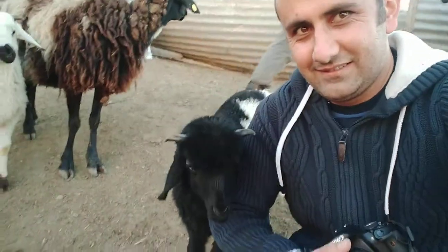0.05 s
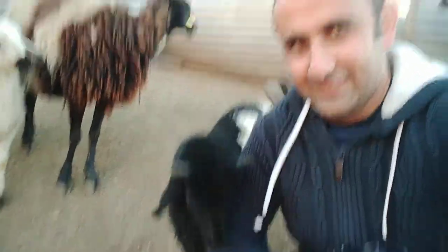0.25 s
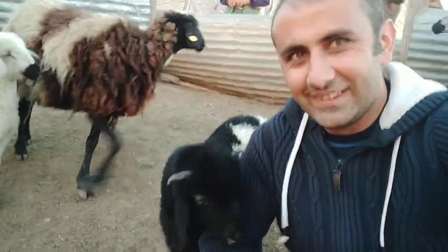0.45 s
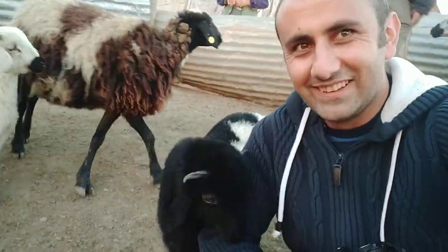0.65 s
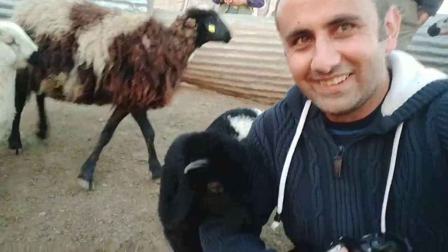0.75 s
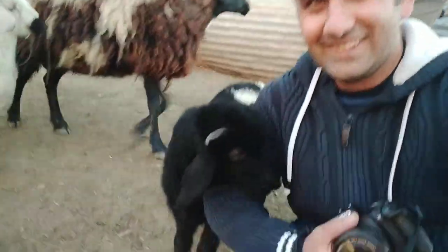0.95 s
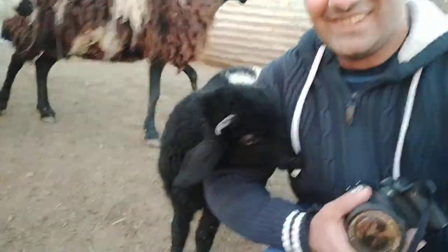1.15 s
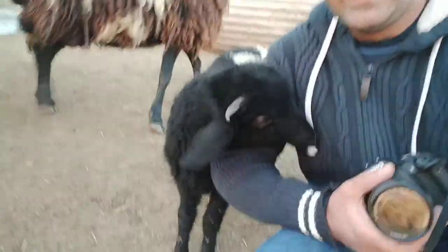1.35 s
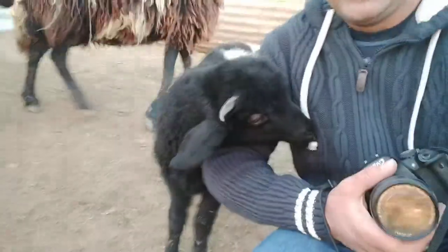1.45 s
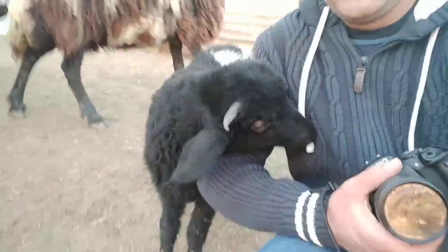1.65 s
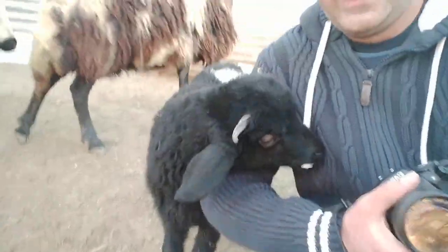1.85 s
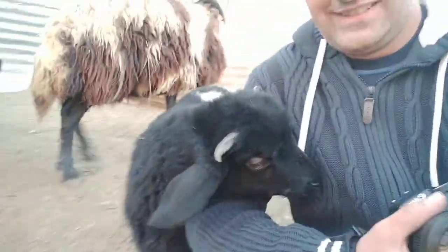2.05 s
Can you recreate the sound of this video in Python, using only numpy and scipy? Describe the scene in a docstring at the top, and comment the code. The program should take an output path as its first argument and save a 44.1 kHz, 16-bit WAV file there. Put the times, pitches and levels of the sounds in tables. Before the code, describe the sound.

A sheep a few steps away grunts through its nose, then gives one long, low bleat in an outdoor pen. Small ticks and a faint distant bleat follow, and a lamb quietly starts a higher, nasal call.

```python
"""A sheep a few steps away in an outdoor pen grunts through its nose, then opens into one long, low bleat:
vocal-fold pulses ring its throat, rough at first, clear on the held note, creaky at the end, coloured by
echoes off the hard ground and fences. Small ticks and thuds of grit and handling follow, with a thin far
whistle and a faint far bleat. Last, a lamb starts a high, nasal call. Soft outdoor air runs underneath."""
import sys
import numpy as np
from scipy import signal
from scipy.fft import rfft, irfft
from scipy.io import wavfile
from scipy.ndimage import uniform_filter1d, map_coordinates

SR = 44100
rng = np.random.default_rng(int(sys.argv[2]) if len(sys.argv) > 2 else 0)


def digitize_waveform(pressure):
    """Quantize a signal to 16-bit integers and store it at the path in sys.argv[1].

    Rows of a 2-D input are taken as channels; values are limited to [-1, 1].
    """
    field = np.atleast_2d(pressure).T
    bounded = np.clip(field, -1, 1)
    quanta = np.round(bounded * 32767).astype(np.int16)
    wavfile.write(sys.argv[1], SR, quanta)


N = 92610
TIME = np.arange(N) / SR

# The bleat's melody: lead-in, held note, falling tail (time [s], pitch [Hz])
PITCH_ONSET = [(0.12, 116.2), (0.19, 119.6)]
PITCH_HELD = [(0.22, 118.5), (0.248, 126.1), (0.28, 129.8), (0.296, 128.9), (0.318, 119), (0.328, 121.9),
              (0.38, 136), (0.426, 127.5), (0.484, 135.8), (0.518, 134.7), (0.634, 134.1), (0.704, 130.6),
              (0.748, 129.3), (0.85, 125.1)]
PITCH_FALL = [(0.871, 111), (0.898, 93.93), (0.938, 73.8)]
# Gravel in the vocal folds (time [s], roughness [0-1])
ROUGHNESS = [(0.2, 0.59), (0.32, 0.76), (0.42, 0.31), (0.5, 0.23), (0.68, 0.22), (0.82, 0.44), (0.88, 0.93)]
# First resonance, rising as the mouth opens (time [s], centre [Hz])
JAW = [(0.22, 518), (0.29, 509), (0.37, 585), (0.55, 590), (0.8, 589.5), (0.89, 547.6)]
# Second resonance, lifted by the tongue (time [s], centre [Hz])
TONGUE = [(0.13, 1170), (0.155, 1300), (0.175, 1790), (0.2, 1900), (0.24, 1717), (0.42, 1712), (0.55, 1768),
          (0.7, 1700), (0.82, 1545), (0.91, 1754)]
# Steady throat resonances in three registers (centre [Hz], width [Hz], gain [dB])
MIDDLE = [(1196, 103, -4), (1395, 100, -1), (1576, 170, -9), (1900, 310, -13)]
UPPER = [(2187, 84, 6.5), (2300, 48, 7), (2340, 225, 3.5), (3080, 150, -11.5)]
TREBLE = [(3370, 340, 2), (4180, 156, -2), (4670, 330, -10), (5500, 660, -11.5), (5930, 580, -11.5),
          (6570, 110, -27)]
# The mouth as four register faders (time [s], low [dB], middle [dB], upper [dB], treble [dB])
MOUTH_CLOSED = [(0.1, -84, -55, -75, -104), (0.135, -63, -43, -59, -77), (0.16, -51.5, -47, -58, -64)]
MOUTH_OPEN = [(0.2, -49, -52, -50, -88), (0.206, -40.5, -35.5, -44, -44), (0.214, -49, -31.5, -27, -54.5),
              (0.254, -35, -33.5, -32, -53.5), (0.278, -25.5, -35.5, -32, -46),
              (0.31, -24.5, -34, -26, -47.5), (0.332, -32.5, -31, -36, -46.5),
              (0.354, -25.5, -28.5, -28, -48), (0.396, -24.5, -27.5, -39.5, -47),
              (0.404, -25, -26, -30, -54), (0.446, -25, -25.5, -30, -47.5), (0.53, -24, -29.5, -33, -49.5),
              (0.558, -25, -29, -26, -49.5), (0.6, -24.5, -27.5, -40, -52), (0.628, -25.5, -30, -30.5, -50),
              (0.706, -26, -28.5, -36.5, -50), (0.782, -26, -32, -29.5, -50),
              (0.806, -27, -32, -35.5, -49.5), (0.845, -28, -38, -30.5, -56)]
MOUTH_CLOSING = [(0.857, -27, -34, -32, -50), (0.863, -28, -30.5, -29.5, -49), (0.872, -28, -33, -32, -49),
                 (0.881, -31, -41, -39, -51), (0.893, -40, -41, -38, -51), (0.912, -48, -38, -40, -52),
                 (0.924, -58, -50, -50, -59), (0.975, -78, -70, -69, -73)]
# Chest fundamental, the body under the bleat (time [s], level [dB])
CHEST = [(0.09, -77), (0.125, -45), (0.2, -40.5), (0.33, -46.5), (0.55, -43), (0.85, -46.5), (0.92, -51),
         (0.99, -81)]
def bleat():
    """Fold pulses ring the throat; the mouth rides each register's level, over a clean chest tone."""
    hz, = in_time(PITCH_ONSET + PITCH_HELD + PITCH_FALL)
    rough, = in_time(ROUGHNESS)
    jaw_hz, = in_time(JAW)
    tongue_hz, = in_time(TONGUE)
    pulses, noise, phase = folds(hz, rough)
    # The higher the register, the more breath in its drive.
    clear = ground_echo(pulses + 0.07 * rough * noise)
    raspy = fence_echoes(ground_echo(pulses + rough * noise))
    airy = fence_echoes(ground_echo(pulses + (0.44 + 3.9 * rough) * noise))
    low = moving_resonance(clear, jaw_hz, width_hz=130)
    low = moving_resonance(low, jaw_hz, width_hz=130)   # twice, for steeper skirts
    middle = resonate(raspy, MIDDLE) + from_db(-1) * moving_resonance(raspy, tongue_hz, width_hz=107)
    registers = [band(low, [400, 815], "band", order=4),
                 band(middle, [944, 2100], "band", order=4),
                 band(resonate(raspy, UPPER), [1900, 3150], "band", order=3),
                 band(resonate(airy, TREBLE), [3100, 7000], "band", order=4)]
    mouth = MOUTH_CLOSED + MOUTH_OPEN + MOUTH_CLOSING
    faders_db = in_time(mouth)
    low_db, middle_db = faders_db[:2]
    voice = sum(levelled(x) * from_db(db) for x, db in zip(registers, faders_db))
    turbulence = rms_one(band(noise, [795, 1130], "band")) * rough * from_db(middle_db - 14)
    opening = np.clip(from_db(.5 * (low_db + 29.5)), 0, 1)   # an open mouth lets the overtones out
    overtones = from_db(-2.5) * np.sin(2 * phase) + from_db(-6) * np.sin(3 * phase)
    chest = np.sqrt(2) * (np.sin(phase) + opening * overtones)
    return (voice + turbulence) * gate(mouth) + chest * envelope(CHEST)


def folds(hz, rough, jitter=0.02, shimmer_db=1):
    """Vocal folds: uneven pulses, a puff of breath noise with each, and the phase of the cycle."""
    turns = np.cumsum(hz * (1 + jitter * rough * drift(80.2))) / SR
    cycle = turns.astype(int)
    starts = np.flatnonzero(np.diff(cycle)) + 1
    late = (turns[starts] % 1) * SR / hz[starts]   # splits each pulse between two samples
    strength = from_db(shimmer_db * rough[starts] * rng.standard_normal(N)[cycle[starts]])
    pulses = np.zeros(N)
    pulses[starts], pulses[starts - 1] = strength * (1 - late), strength * late
    puffs = np.exp(-(turns % 1) / 0.17) + 0.027
    return rms_one(pulses), rms_one(rng.standard_normal(N) * puffs), 2 * np.pi * turns


# Breathy top of the bleat (time [s], level [dB])
BREATH_LEVEL = [(0.0, -76.5), (0.1, -65.5), (0.15, -57), (0.195, -95), (0.21, -56), (0.3, -54), (0.48, -56),
                (0.7, -57.5), (0.87, -62), (0.93, -67), (0.98, -72)]
# Its sheen (centre [Hz], width [Hz], gain [dB])
BREATH_COLOUR = [(7600, 1200, -4.5), (8450, 280, 5), (9670, 600, -4), (11340, 1000, -3), (14100, 1100, -2),
                 (15370, 960, -8)]
def breath():
    """Air rushing through the sheep's throat: a high hiss with a slight flutter."""
    noise = resonate(rng.standard_normal(N), BREATH_COLOUR)
    hiss = ground_echo(band(noise, 6800, "high", order=4))
    return rms_one(hiss) * envelope(BREATH_LEVEL) * from_db(1.83 * drift(59))


# Closed-mouth hum (time [s], pitch [Hz], level [dB])
HUM = [(0.0, 201.5, -56), (0.04, 176.7, -57.5), (0.075, 192.5, -50.5), (0.105, 211.6, -39),
       (0.125, 212.5, -39.5), (0.16, 206, -52), (0.2, 202, -85)]
# Rasp through the nose (time [s], level [dB])
GRUNT_RASP = [(0.0, -66), (0.04, -59.5), (0.08, -49), (0.115, -45), (0.135, -49.5), (0.16, -79)]
# Single creaks of the folds (time [s], peak [dB])
CREAKS = [(0.024, -40.5), (0.05, -37.5), (0.074, -36.5), (0.124, -26)]
# Nasal colour (centre [Hz], width [Hz], gain [dB])
NOSE = [(168, 72, 8.5), (1016, 80, 8), (1550, 390, 0), (2270, 133, 3), (2700, 600, -9)]
def grunt():
    """Before the mouth opens: a hum, a rasp an octave below it and a few creaks through the nose."""
    hz, db = in_time(HUM)
    out = tone(hz * (1 + 0.097 * drift(40))) * from_db(db) * gate(HUM)
    pulses, noise, _ = folds(hz / 2, rough=np.ones(N))
    rasp = band(resonate(pulses + 4.5 * noise, NOSE), 5400, "low")
    out += rms_one(ground_echo(rasp)) * envelope(GRUNT_RASP)
    for start, peak_db in CREAKS:
        pulse = signal.unit_impulse(N, int(start * SR))
        creak = ground_echo(band(resonate(pulse, NOSE), 3700, "low", order=3))
        out += from_db(peak_db) * creak / np.abs(creak).max()
    return out


# The lamb's call and the far bleat (time [s], pitch [Hz], level [dB], roughness [0 = clean])
LAMB = [(1.7, 285, -74, 1.1), (1.79, 290.7, -64.5, 1.04), (1.88, 292.7, -71, 0.73),
        (1.94, 293.5, -64.5, 0.42), (1.98, 299, -62, 0.2), (2.02, 307.4, -52.5, 0),
        (2.03, 301.4, -49.5, 0.17), (2.1, 299, -50, .08)]
FAR_BLEAT = [(1.15, 232.6, -85, 0.77), (1.3, 256, -65, 1.11), (1.45, 243.6, -67.5, .6),
             (1.62, 240.3, -67, 0.28), (1.8, 258.3, -77, 0.4), (1.95, 245, -72, .9)]
# Their throats (centre [Hz], width [Hz], gain [dB])
LAMB_THROAT = [(620, 90, -19), (896, 47, -12), (1230, 230, -17.5), (2700, 240, -7.5), (3310, 90, 0.5),
               (3890, 170, -3.5), (4480, 550, -12.5), (6200, 620, -21)]
FAR_THROAT = [(728, 50, -2.5), (1510, 360, -10), (2380, 260, -6.5)]
def flock_call(curve, throat, rasp):
    """Another animal of the flock: pulses and breath ring its throat, and the level shakes when rough."""
    hz, db, rough = in_time(curve)
    pulses, noise, _ = folds(hz, rough)
    voice = band(resonate(pulses + rasp * rough * noise, throat), 4600, "low")
    return levelled(voice) * from_db(db + 2.5 * rough * drift(30)) * gate(curve)


# Ticks of grit and handling (time [s], peak [dB], centre [Hz], width [Hz], decay [s])
TICKS = [(0.175, -31, 2960, 3980, 0.00069), (1.051, -50, 1350, 200, 0.0042),
         (1.369, -45, 2180, 3440, 0.0004), (1.455, -42.5, 2700, 1950, 0.001),
         (1.458, -38.5, 2690, 1960, 0.00064), (1.5852, -37, 9050, 8000, 0.0002),
         (1.603, -47, 1010, 400, 0.0016), (1.602, -42.5, 2560, 2960, 0.001),
         (1.683, -53, 7020, 8000, 0.0023), (2.031, -47, 6000, 8200, 0.0017)]
def ticks(grains_per_s=350, grit_db=-76):
    """Short dry contacts, each a noise burst through one resonance, over a sprinkle of fainter grit."""
    out = np.zeros(N)
    for start, peak_db, hz, width_hz, decay_s in TICKS:
        burst = rng.standard_normal(N) * (TIME >= start) * np.exp(-np.abs(TIME - start) / decay_s)
        tick = band(resonate(burst, [(hz, width_hz, 0)]), hz + 2 * width_hz, "low")
        out += from_db(peak_db) * tick / np.abs(tick).max()
    grains = (rng.random(N) < grains_per_s / SR) * rng.standard_normal(N)
    grit = band(grains + 1e-18, [1500, 12000], "band", order=1)
    return out + from_db(grit_db) * rms_one(grit)


# Soft thuds of hooves and handling (time [s], gain [dB], pitch [Hz], decay [s])
THUDS = [(0.022, -55, 137, 0.029), (0.047, -40, 149, 0.0085), (1.358, -48, 450, 0.0036),
         (1.678, -58, 204, 0.039), (2.019, -47.5, 135, 0.0078)]
def thuds(attack_s=0.0026):
    """Low knocks: damped sines with a rounded attack."""
    out = np.zeros(N)
    for start, db, hz, decay_s in THUDS:
        age = np.maximum(TIME - start, 0)
        shape = np.exp(-age / decay_s) * (1 - np.exp(-age / attack_s))
        out += from_db(db) * np.sin(2 * np.pi * hz * age) * shape
    return out


# Two strands of far whistle, each a list of (time [s], pitch [Hz], level [dB])
WHISTLES = [
    [(1.05, 7600, -83), (1.19, 8380, -79), (1.24, 7950, -78), (1.3, 7670, -69), (1.42, 7550, -70.5),
     (1.5, 7400, -80), (1.6, 6970, -77)],
    [(1.25, 8450, -79), (1.45, 8330, -88), (1.55, 8060, -80), (1.65, 8350, -87), (1.75, 8300, -90)],
]
def whistle():
    """Thin, unsteady tones that waver and sink slowly."""
    out = np.zeros(N)
    for strand in WHISTLES:
        hz, db = in_time(strand)
        out += tone(hz + 130 * drift(350)) * from_db(db + 2.5 * drift(40)) * gate(strand)
    return out


# Ground bounce, shifting as the sheep walks (time [s], delay [ms])
GROUND_DELAY = [(0.1, 1.73), (0.55, 1.76), (0.9, 1.64)]
def ground_echo(x, gain=0.43):
    """Direct sound plus its bounce off the hard ground: a slowly moving comb filter."""
    delay_ms, = in_time(GROUND_DELAY)
    return x + gain * map_coordinates(x, [np.arange(N) - delay_ms * SR / 1000], order=3)


# Reflections off the fence and troughs (delay [ms], gain [linear])
FENCE_ECHOES = [(3.7, 0.24), (5.6, 0.3), (11.3, 0.24)]
def fence_echoes(x):
    """Early echoes that fill the gaps between pulses."""
    return x + sum(gain * np.interp(TIME - ms / 1000, TIME, x, left=0) for ms, gain in FENCE_ECHOES)


def pen_reverb(x, t60_s=0.22, wet_db=-19, predelay_s=0.008):
    """A faint, thin tail from the fences."""
    decay = from_db(-60 * TIME / t60_s) * (TIME > predelay_s)
    tail = band(rng.standard_normal(N) * decay, [330, 6800], "band")
    return from_db(wet_db) * signal.fftconvolve(x, tail / np.linalg.norm(tail))[:N]


# EQ curve of the outdoor bed (frequency [Hz], gain [dB])
AIR_EQ = [(25, -1), (90, -8), (170, -13), (400, -20), (800, -19), (1100, -17.5), (3500, -23.5), (5000, -43),
          (6500, -31.5), (8000, -35), (11000, -36.5), (15500, -28.5)]
def air(level_db=-61.5):
    """Steady outdoor rumble and hiss."""
    hz, db = np.transpose(AIR_EQ)
    bins_hz = np.fft.rfftfreq(N, 1 / SR)
    colour = from_db(np.interp(np.log(bins_hz + 1), np.log(hz), db))
    return from_db(level_db) * rms_one(irfft(rfft(rng.standard_normal(N)) * colour, N))


def from_db(db):
    """Decibels to gain."""
    return 10 ** (np.asarray(db) / 20)


def rms_one(x):
    """Scale to unit rms."""
    return x / np.sqrt(np.mean(x ** 2) + 1e-20)


def levelled(x, size=1000):
    """Hold the level at rms 1 over a few cycles."""
    power = uniform_filter1d(uniform_filter1d(x * x, size), size)
    return x / np.sqrt(np.abs(power) + 1e-14)


def in_time(rows):
    """Each column of a curve, sample by sample."""
    times, *columns = np.transpose(rows)
    return [np.interp(TIME, times, column) for column in columns]


def gate(rows):
    """Open while a curve lasts, with soft edges."""
    return uniform_filter1d(1.0 * ((TIME >= rows[0][0]) & (TIME <= rows[-1][0])), size=400)


def envelope(rows):
    """A level curve as a gain, silent outside its span."""
    return from_db(in_time(rows)[0]) * gate(rows)


def tone(hz):
    """A sine of rms 1 that follows a pitch curve."""
    return np.sqrt(2) * np.sin(2 * np.pi * np.cumsum(hz) / SR)


def band(x, hz, kind, order=2):
    """Butterworth filter."""
    return signal.sosfilt(signal.butter(order, np.clip(hz, 10, .47 * SR), kind, fs=SR, output="sos"), x)


def drift(hz):
    """Random wobble of rms 1, low-passed at hz."""
    return rms_one(band(rng.standard_normal(2 * N), hz, "low")[N:])


def resonator(hz, width_hz):
    """Coefficients of one resonance with gain 1 at its peak."""
    r = np.exp(-np.pi * width_hz / SR)
    return (1 - r * r) / 2 * np.array([1, 0, -1]), [1, -2 * r * np.cos(2 * np.pi * hz / SR), r * r]


def resonate(x, rows):
    """Parallel resonances of alternating sign."""
    return sum((-1) ** k * from_db(db) * signal.lfilter(*resonator(hz, width_hz), x + 1e-18)
               for k, (hz, width_hz, db) in enumerate(rows))


def moving_resonance(x, hz, width_hz, size=128):
    """A resonance whose centre follows a curve."""
    out, state = np.zeros(N), np.zeros(2)
    for i in range(0, N, size):
        out[i:i + size], state = signal.lfilter(*resonator(hz[i], width_hz), x[i:i + size], zi=state)
    return out


def scene():
    """Mono mix: near sources with the pen's reverb, far ones dry, and the air underneath."""
    near = bleat() + breath() + grunt() + ticks() + thuds() + flock_call(LAMB, LAMB_THROAT, rasp=1.5)
    far = flock_call(FAR_BLEAT, FAR_THROAT, rasp=3.1) + whistle()
    return (near + pen_reverb(near) + far + air())[None]


def record(dry):
    """A steep high cut at 15.9 kHz."""
    return signal.sosfilt(signal.ellip(12, .1, 80, 15900, fs=SR, output="sos"), dry)


dry = scene()
out = record(dry)
digitize_waveform(out)
```